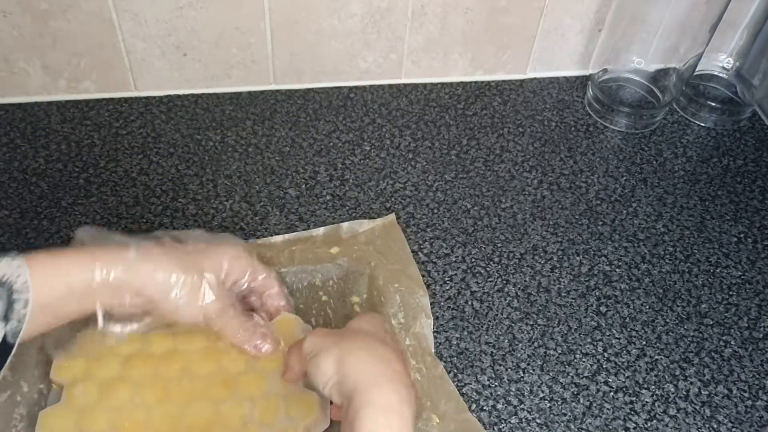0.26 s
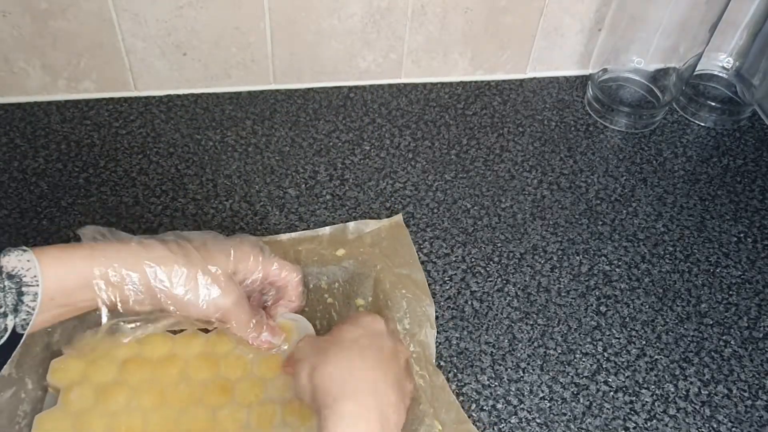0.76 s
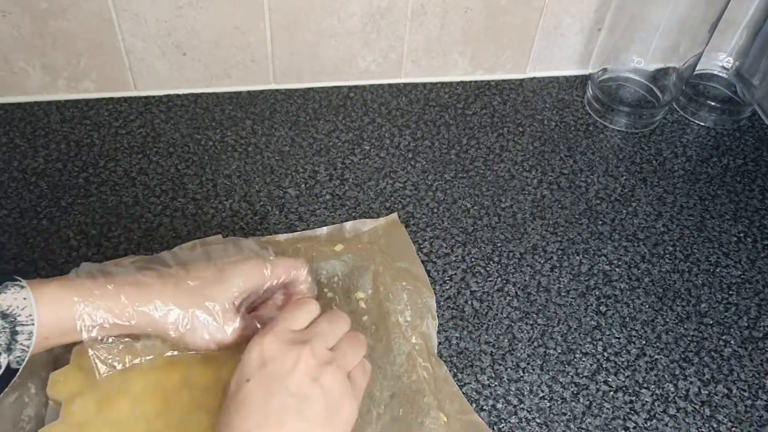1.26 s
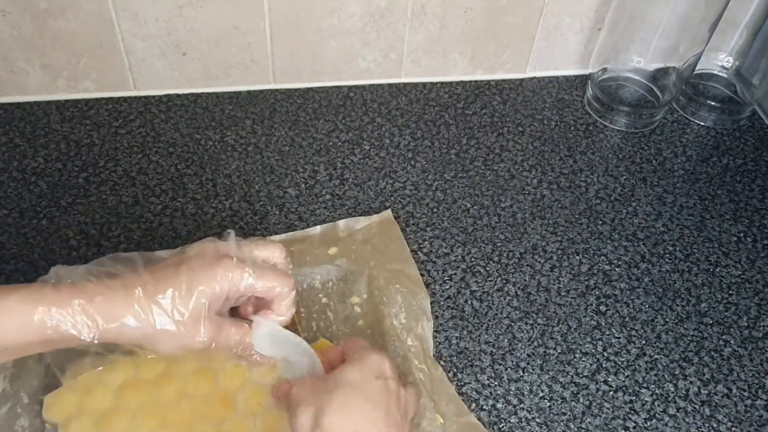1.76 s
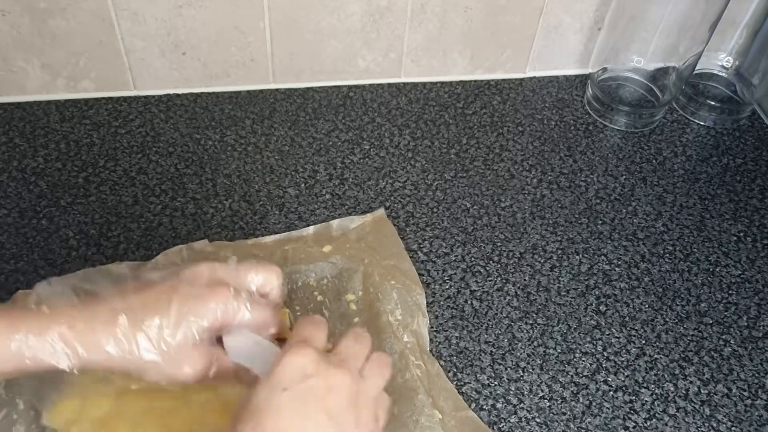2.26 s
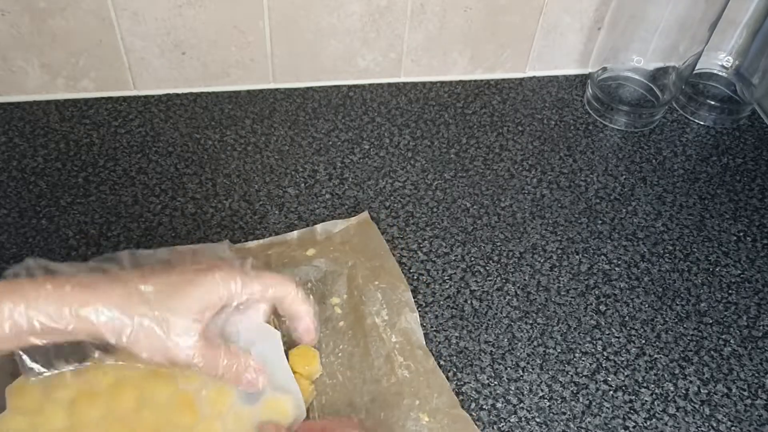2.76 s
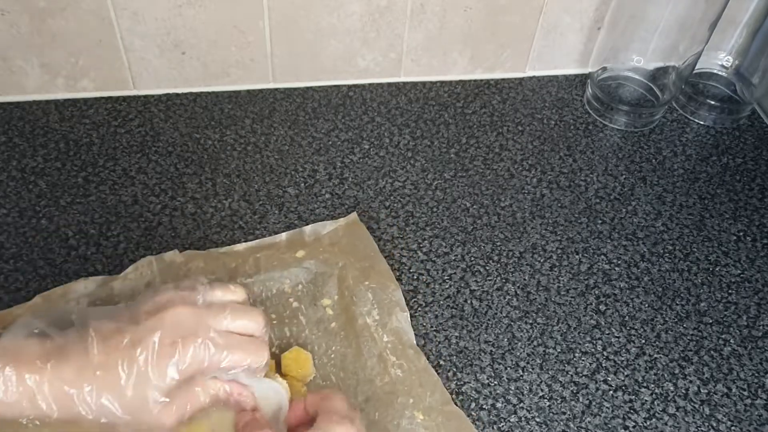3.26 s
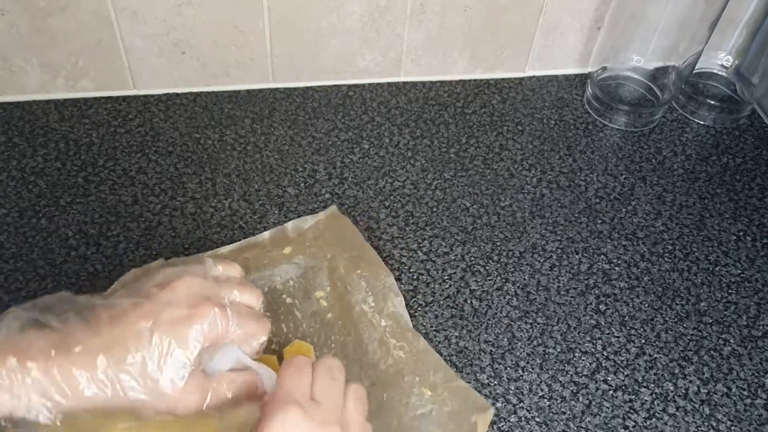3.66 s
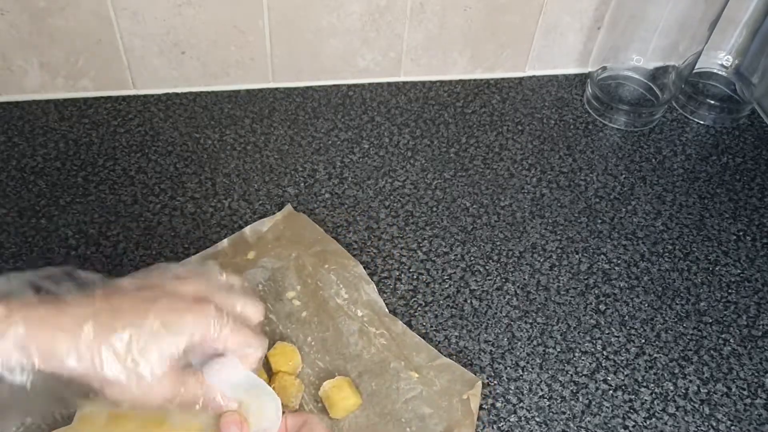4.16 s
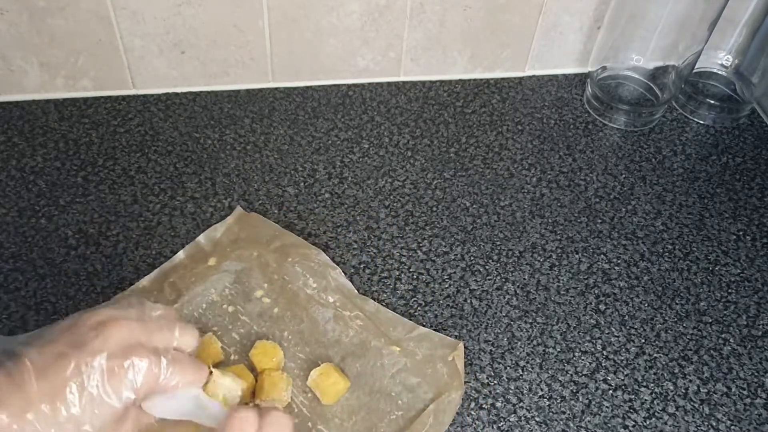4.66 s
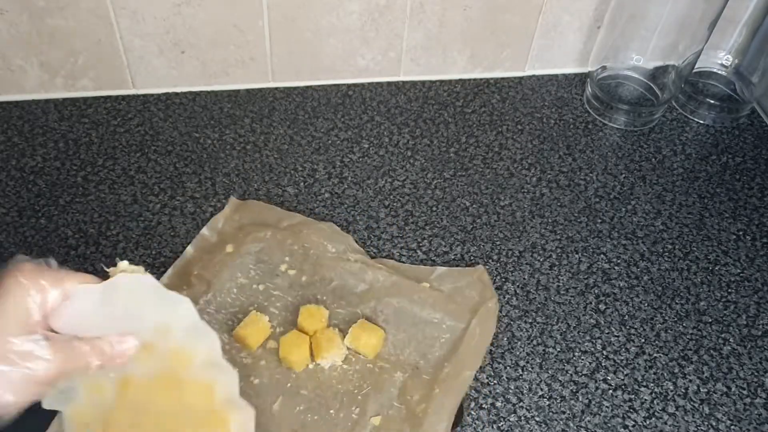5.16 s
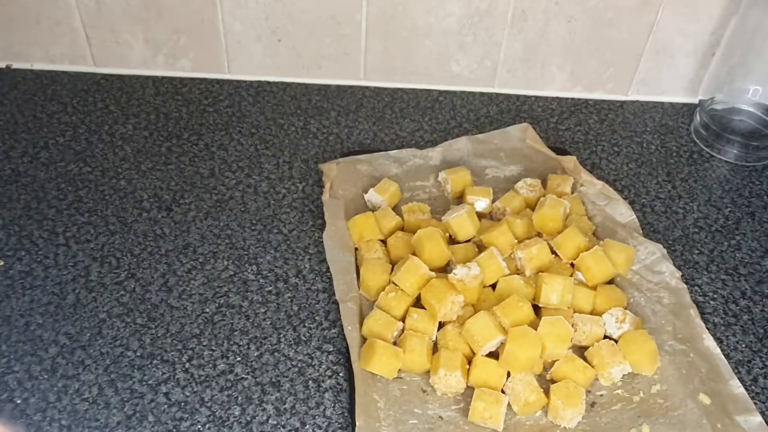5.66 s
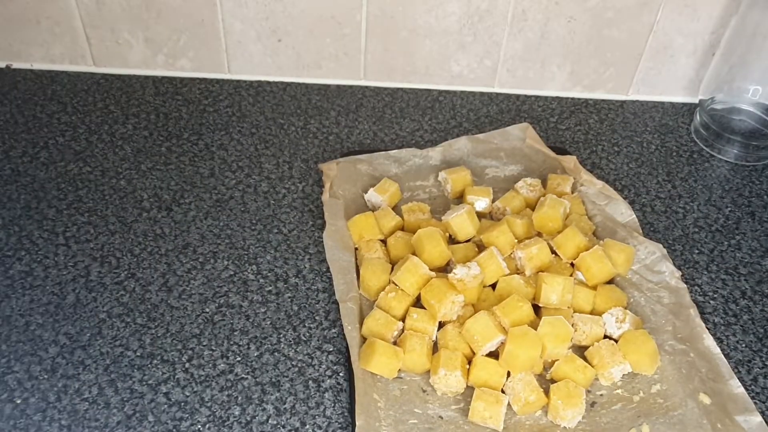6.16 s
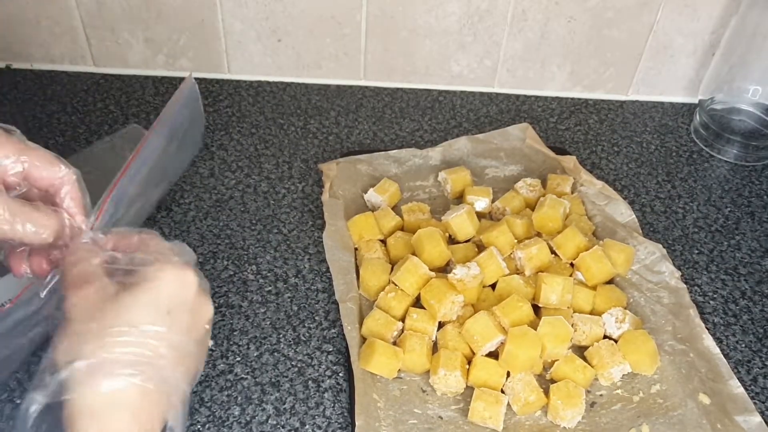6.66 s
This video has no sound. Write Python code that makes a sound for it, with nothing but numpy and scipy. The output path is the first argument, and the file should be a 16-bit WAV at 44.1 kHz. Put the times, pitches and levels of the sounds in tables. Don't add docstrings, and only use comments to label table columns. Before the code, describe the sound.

Thin plastic gloves rustle while frozen cubes crack loose from a flexible tray in sharp pops, then a plastic bag crinkles brightly.

```python
import sys
import numpy as np
from scipy import signal
from scipy.fft import rfft, irfft, next_fast_len
from scipy.io import wavfile
from scipy.ndimage import uniform_filter1d, map_coordinates

SR = 44100
rng = np.random.default_rng(int(sys.argv[2]) if len(sys.argv) > 2 else 0)


def linear_from_db(decibels):
    return 10 ** (np.asarray(decibels, float) / 20)


def store_wav(level_fs):
    pcm = np.round(np.clip(np.atleast_2d(level_fs), -1, 1) * 32767)
    wavfile.write(sys.argv[1], SR, pcm.T.astype(np.int16))


N = 304290

# (fade out t/s, sound returns t/s, fade-in length/s)
SCENE_CHANGE = (5.444, 5.455, 0.045)
LEFT_LEAD = {"tray": 5, "hands": 6, "bag": 11}

# (f/Hz, level/dB per Hz)
AIR_COLOUR = [(20, -14.5), (45, 4), (120, -3), (250, -10), (700, -15), (1000, -22), (2500, -29),
              (7000, -19), (8800, -49), (15000, -48)]
# (f/Hz, time to fall 60 dB/s)
ECHO_TIME = [(100, 0.077), (1200, 0.12), (3000, 0.1), (6000, 0.066), (9000, 0.042), (15000, 0.0116)]
# (f/Hz, likeness 0 to 1)
PORT_LIKENESS = [(60, 0.96), (300, 0.87), (1000, 0.27), (2500, 0.11), (5000, 0.011), (15000, 0.014)]

# (f/Hz, level/dB per Hz)
PLASTIC_COLOUR = [(180, -46), (300, -14.5), (787, -5.5), (870, -8), (1060, -10.5), (1900, -6.5),
                  (2320, -6.5), (2930, -4), (6850, -1), (8500, -8), (15500, -4), (16300, -13.5)]
# (f/Hz, level/dB per Hz)
PAPER_COLOUR = [(200, -16), (400, -3), (850, -18.5), (1200, 2), (2400, 1.5), (3500, -0.5), (6000, -6),
                (12000, -41)]
# (peak t/s, level/dB, swell/s, sink/s)
GLOVE_STROKES = [(0.009, -40.5, 0.015, 0.0374), (0.073, -44.5, 0.12, 0.18), (0.129, -40.5, 0.0322, 0.0218),
                 (0.147, -43, 0.026, 0.0312), (0.2, -42, 0.0291, 0.0353), (0.266, -50.5, 0.053, 0.0114),
                 (0.342, -46.5, 0.058, 0.0332), (0.381, -49, 0.0062, 0.0093), (0.471, -54.5, 0.034, 0.0322),
                 (0.542, -53, 0.0072, 0.026), (0.586, -50, 0.029, 0.0114), (0.626, -53.6, 0.0312, 0.14),
                 (0.699, -53, 0.1362, 0.052), (0.784, -58.4, 0.0062, 0.1861), (0.819, -50.5, 0.0197, 0.0135),
                 (0.849, -44.5, 0.02, 0.024), (0.909, -51, 0.0343, 0.08), (0.985, -50, 0.0364, 0.0249),
                 (1.027, -55.2, 0.0114, 0.027), (1.071, -55, 0.026, 0.028), (1.095, -53.9, 0.0062, 0.0176),
                 (1.127, -51, 0.0145, 0.0166), (1.166, -50, 0.0062, 0.0145), (1.242, -48.5, 0.0748, 0.0093),
                 (1.289, -43.5, 0.0239, 0.0093), (1.314, -46.5, 0.0249, 0.076), (1.376, -42.5, 0.0228, 0.017),
                 (1.419, -54.5, 0.1976, 0.07), (1.537, -57.9, 0.0072, 0.261), (1.56, -43.5, 0.0062, 0.0145),
                 (1.611, -59.4, 0.0904, 0.0104), (1.654, -45, 0.0072, 0.0085), (1.682, -40, 0.0052, 0.024),
                 (1.779, -59.2, 0.0062, 0.0644), (1.859, -55, 0.046, 0.2319), (1.959, -49, 0.024, 0.0093),
                 (2.004, -44, 0.026, 0.1), (2.115, -50, 0.0114, 0.062), (2.172, -48, 0.0176, 0.0436),
                 (2.257, -50.0, 0.018, 0.0187), (2.308, -37, 0.0093, 0.021), (2.401, -47.1, 0.0322, 0.0135),
                 (2.424, -47, 0.0135, 0.059), (2.493, -39.0, 0.025, 0.076), (2.563, -46, 0.0239, 0.0104),
                 (2.603, -49.5, 0.0093, 0.0769), (2.656, -30.5, 0.0062, 0.015), (2.732, -42, 0.0384, 0.037),
                 (2.749, -41.5, 0.018, 0.032), (2.862, -47, 0.1, 0.038), (2.935, -47, 0.05, 0.11),
                  (3.049, -48.5, 0.042, 0.023), (3.08, -46, 0.017, 0.14), (3.191, -44, 0.016, 0.011),
                  (3.224, -51.5, 0.021, 0.045), (3.303, -59, 0.033, 0.029), (3.333, -50.5, 0.04, 0.023),
                  (3.396, -51, 0.01, 0.017), (3.428, -53, 0.0091, 0.013), (3.512, -55, 0.021, 0.027),
                  (3.541, -54, 0.014, 0.031), (3.61, -50.5, 0.0093, 0.018), (3.671, -32, 0.014, 0.021),
                  (3.791, -47, 0.034, 0.018), (3.933, -49, 0.058, 0.02), (3.969, -52, 0.046, 0.022),
                  (4.026, -48, 0.034, 0.017), (4.05, -48, 0.019, 0.034), (4.182, -50, 0.11, 0.15),
                  (4.274, -59, 0.071, 0.019), (4.297, -56, 0.0083, 0.014), (4.352, -62, 0.0083, 0.016),
                  (4.375, -60, 0.014, 0.012), (4.438, -46.5, 0.064, 0.021), (4.473, -49, 0.036, 0.039),
                  (4.557, -43.5, 0.053, 0.023), (4.586, -44.5, 0.029, 0.0092),
                  (4.604, -31.5, 0.0053, 0.017), (4.697, -48, 0.019, 0.011), (4.748, -63, 0.041, 0.016),
                  (4.774, -42, 0.011, 0.018), (4.831, -45.5, 0.03, 0.03), (4.862, -59, 0.017, 0.035),
                  (4.909, -48, 0.006, 0.024), (4.957, -50.5, 0.018, 0.037), (5.006, -71, 0.013, 0.039),
                  (5.093, -48, 0.063, 0.029), (5.14, -36.5, 0.0064, 0.011), (5.217, -50.5, 0.011, 0.031),
                  (5.269, -54.5, 0.031, 0.04), (5.305, -54.5, 0.025, 0.08), (5.38, -54.5, 0.046, 0.067),
                  (5.438, -66, 0.015, 0.0037)]
# (peak t/s, level/dB, swell/s, sink/s)
BAG_HANDLING = [(5.478, -65, 0.007, 0.005), (5.507, -53, 0.012, 0.042), (5.535, -44.5, 0.02, 0.063),
                (5.569, -44, 0.03, 0.038), (5.615, -42, 0.023, 0.028), (5.64, -37, 0.027, 0.032),
                (5.679, -39, 0.035, 0.05), (5.715, -40.5, 0.049, 0.0074), (5.802, -48, 0.053, 0.016),
                (5.831, -48, 0.01, 0.031), (5.849, -46, 0.006, 0.023), (5.875, -45, 0.005, 0.011),
                (5.895, -43.5, 0.0092, 0.024), (5.941, -44, 0.037, 0.012), (6.011, -32.5, 0.031, 0.016),
                (6.071, -40, 0.075, 0.096), (6.108, -30.5, 0.031, 0.074), (6.14, -31, 0.075, 0.02),
                (6.218, -37.5, 0.014, 0.018), (6.356, -44.5, 0.095, 0.061), (6.401, -38, 0.016, 0.12),
                (6.478, -41.5, 0.099, 0.015), (6.544, -42, 0.015, 0.038), (6.591, -36.5, 0.009, 0.0084),
                (6.658, -38, 0.08, 0.03), (6.705, -41, 0.02, 0.024), (6.744, -41.5, 0.058, 0.084),
                (6.805, -30.5, 0.016, 0.01), (6.835, -28.5, 0.02, 0.013), (6.889, -41, 0.043, 0.067)]
# (peak t/s, level/dB, swell/s, sink/s)
LOW_SCUFFS = [(.19, -41, 0.28, 0.11), (.37, -51.5, 0.18, 0.012), (.6, -49.5, 0.031, 0.15),
              (1, -51.5, 0.28, 0.15), (1.41, -51, 0.39, 0.05), (1.69, -55, 0.22, 0.31),
              (2.02, -51.5, 0.051, 0.4), (2.29, -50, 0.054, 0.16), (2.5, -48, 0.028, 0.074),
              (2.75, -46, 0.21, 0.24), (3.1, -57, 0.21, 0.58), (3.67, -35.5, 0.032, 0.051),
              (3.79, -46.5, 0.0092, 0.013), (3.9, -50.5, 0.21, 0.35), (4.44, -42, 0.036, 0.053),
              (4.56, -43, 0.054, 0.06), (4.65, -44, .02, 0.051), (4.96, -44.5, 0.051, 0.056),
              (5.12, -41.5, 0.094, 0.046), (5.17, -31, 0.03, 0.032), (5.25, -54, .05, 1),
              (5.6, -47.5, 0.052, 0.2), (5.7, -43.5, 0.24, 0.034), (5.86, -51.5, 0.13, 0.39),
              (6.08, -41, 0.054, 0.17), (6.48, -50, 0.12, 0.039), (6.8, -50, 0.34, 0.07),
              (6.9, -48, 0.029, .1)]

# (f/Hz, level/dB per Hz)
ICE_COLOUR = [(120, -49.5), (250, -11.5), (650, -3.5), (850, -9), (1200, -2.5), (1900, -5.5), (2700, -3.5),
              (4000, -4), (6300, -11.5), (9000, -30), (13500, -22.5), (16500, -45)]
# (f/Hz, width/Hz, level/dB)
TRAY_MODES = [(657, 51, 3.5), (861, 17, 5.5), (1150, 55, 6.5), (1456, 16, 5), (1767, 44, 4), (1900, 95, 6),
              (2374, 94, 3.5), (2640, 37, 5.5), (3150, 130, 1.5)]
# (t/s, level/dB, cavity f/Hz, brightness/dB, tearing time/ms)
ICE_TEARS = [(.001, -32, 1440, -35, 13), (1.212, -39, 1850, 0, 8.4), (1.313, -22, 1150, -34, 8.2),
             (2.105, -22.5, 1150, -27, 13), (2.323, -24.5, 1230, -30, 12.7), (2.484, -29, 2160, -47, 6.8),
             (3.636, -18.5, 1170, -39, 14.2), (3.663, -7.5, 1880, -26, 8.8), (3.677, -12.5, 1220, -37, 8),
             (3.699, -25.5, 1180, -32, 6.2), (4.386, -35, 1120, -33, 21), (4.426, -34, 1330, -24, 19),
             (4.467, -38, 1490, -18, 7.2), (4.52, -28, 1730, -12, 13.6), (6.1, -19.5, 1700, -17, 8),
             (3.714, -34, 1300, -13, 9.2), (1.393, -42, 2440, -26, 3.9)]
# (t/s, level/dB, cavity f/Hz, brightness/dB)
ICE_TICKS = [(0.377, -29, 2800, -1), (0.542, -33, 1800, 15), (3.967, -39, 1120, -30),
             (0.582, -32.5, 2720, 5), (0.933, -29, 2770, -20), (1.125, -33, 1720, -3),
             (1.163, -34, 2040, -14), (1.785, -39.5, 1580, -30), (3.299, -33.5, 2530, -7),
             (3.365, -36.5, 880, -3), (3.485, -40, 710, -18), (3.594, -43, 756, -7),
             (3.902, -33.5, 1380, -4), (4.293, -31, 1160, -8), (4.63, -30, 1480, -8),
             (4.905, -34, 1600, 13), (4.952, -29, 2010, -18), (5.001, -35.5, 1690, -13),
             (5.3684, -26, 1900, -33), (5.392, -33, 2850, -29.5), (5.637, -25, 3020, -15)]
# (t/s, level/dB, cavity f/Hz, brightness/dB, body/dB)
CUBE_POPS = [(1.324, -21.5, 1430, -40, -14.5), (1.6772, -11, 1150, -13, -13.5),
             (1.684, -21.5, 1150, -47, -14.5), (2.118, -18, 1170, -29, -13), (2.3028, -12, 656, -22, -14.5),
             (2.311, -18.5, 1180, -33, -20), (2.654, -16, 2760, 11, -11.5), (4.598, -8.5, 1050, -30, -28),
             (4.6045, -7, 1310, -14, -27.5), (4.768, -18.5, 1600, -23, -24), (5.135, -3, 1200, -30, -24),
             (5.14, -6, 1420, -28, -21), (6.797, -20, 544, -44, -28)]

# (t/s, level/dB, f/Hz)
WORKTOP_KNOCKS = [(0.019, -42, 114), (1.324, -43.5, 108), (1.677, -34, 139), (1.786, -39, 94),
                  (2.104, -39, 139), (2.111, -34, 114), (2.176, -40.5, 103), (2.306, -38, 193),
                  (2.313, -30.5, 107), (2.659, -36.5, 124), (2.783, -44.5, 104), (3.642, -33, 113),
                  (3.846, -42.5, 120.5), (4.31, -42.5, 124), (4.426, -42, 119), (4.507, -40.5, 118),
                  (4.6, -37, 109), (4.692, -49, 200), (4.925, -40, 121), (5.137, -27.5, 132.5),
                  (5.37, -45, 101), (6.098, -34.5, 106.6), (6.582, -49, 107), (6.795, -41.5, 127)]
# (t/s, level/dB, left-right/dB)
GLOVE_SNAPS = [(0.3774, -29.5, 1), (0.8462, -34, -1), (0.9864, -37, 1), (1.1645, -28, -9), (1.272, -43, -4),
               (1.372, -35, 8), (1.5557, -29.5, -5), (1.6493, -32, -2), (2.0013, -33, 13), (2.488, -35, 9),
               (2.6532, -22, 3), (2.739, -29, 2), (3.0754, -34, 4), (3.189, -37, -11), (4.599, -15, -6),
               (4.905, -29.5, 4),
               (0.1994, -38, 1), (0.542, -38, 0.0), (0.8145, -44, -1.0), (1.0914, -44, -1.5),
               (1.2894, -37, -3), (1.7759, -46, -1.0), (2.4179, -37, 6), (2.6005, -41, -1.5),
               (3.0185, -35, 2), (3.0464, -32, 1.0), (3.2194, -41, 3), (3.3907, -36, -0.5),
               (3.4268, -38, 3), (3.5084, -38, -2.5), (3.55, -39, -1.0), (3.9, -41, -2.5),
               (4.0482, -35, -5), (4.117, -40, -1.0), (4.1684, -39, -1.0), (4.3555, -39, 7),
               (4.7686, -30, -0.5), (5.2094, -40, -1.5)]
# (t/s, level/dB, left-right/dB)
BAG_FILM_SNAPS = [(5.4742, -36.5, -21.5), (5.506, -35.5, -25), (5.5198, -30, -8), (5.609, -25.5, 5),
                  (5.7116, -30.5, 18), (5.8504, -31.5, 6.5), (5.874, -28, 6), (5.893, -29, 5),
                  (6.008, -22, -15), (6.08, -21, 5), (6.102, -14.5, -3), (6.2153, -28, -7),
                  (6.5875, -26.5, -3), (6.7038, -17, 0), (6.797, -17.5, -14), (6.8267, -30, 5),
                  (6.8312, -34, -10)]
# (t/s, level/dB, f/Hz, left-right/dB)
CUBE_TAPS = [(1.679, -17, 1170, -6), (1.685, -10, 1190, 1), (2.788, -41.5, 700, 8), (3.788, -30, 656, 7.5),
             (3.968, -36, 660, 4), (4.694, -35, 704, 13), (5.1355, -5, 1150, 4), (6.703, -41, 734, 14),
             (6.799, -20, 504, 7), (0.583, -30.5, 2650, 9), (1.163, -31.5, 1990, 5), (2.884, -33, 3600, -3),
             (3.79, -40, 1770, 0.1), (3.967, -35, 1280, -3), (3.672, -13, 1900, -6), (3.672, -20, 4320, 18),
             (4.536, -27, 1760, -5), (4.767, -28, 1400, -11), (5.136, -9.5, 2630, -9),
             (5.147, -18, 3120, -10), (5.151, -12, 1210, -5), (5.164, -24, 3150, 3), (6.803, -28, 1900, 7),
             (1.6805, -15, 660, 8.5), (2.1231, -23, 1250, 2), (4.5995, -10, 1255, 5)]
# (t/s, level/dB, f/Hz)
NARROW_CREAKS = [(0.685, -39, 2050), (0.916, -44, 2600), (1.225, -43.5, 2500), (4.378, -43, 1200),
                 (4.404, -44, 1190), (4.52, -35, 1210), (2.052, -39, 1320), (2.245, -36.5, 1180),
                 (2.516, -34, 1910), (5.036, -42.5, 1150), (5.519, -32.5, 2850), (5.602, -32, 2960),
                 (5.663, -32, 2850)]


def unit(x):
    return x / np.sqrt(np.mean(x ** 2) + 1e-20)


def along(points, hz):
    f, value = np.transpose(points)
    return np.interp(np.log(hz + 1), np.log(f + 1), value)


def wobble(rate):
    knots = rng.standard_normal(int(N * rate / SR) + 4)
    return unit(map_coordinates(knots, [np.arange(N) * rate / SR]))


def coloured(x, gain_db):
    m = 2 * next_fast_len(x.shape[-1] // 2 + 512)
    gain = linear_from_db(gain_db(np.fft.rfftfreq(m, 1 / SR)))
    cepstrum = irfft(np.log(np.maximum(gain, 1e-6)), m)
    cepstrum[..., 1:m // 2] *= 2
    cepstrum[..., m // 2 + 1:] = 0
    return irfft(rfft(x, m) * np.exp(rfft(cepstrum)), m)[..., :x.shape[-1]]


def ports(pair):
    size = pair.shape[-1]
    turn = np.arccos(np.clip(along(PORT_LIKENESS, np.fft.rfftfreq(size, 1 / SR)), -1, 1)) / 2
    z = rfft(pair)
    mid = z[..., 0, :] * np.cos(turn)
    side = z[..., 1, :] * np.sin(turn)
    return irfft(np.stack([mid + side, mid - side], axis=-2), size)


def panned(x, db):
    return x * linear_from_db(np.array([db / 2, -db / 2]).reshape(2, -1))


def leading(x, samples):
    return np.array([x[0], np.pad(x[1], (samples, 0))[:N]])


def laid(rows, seconds):
    out = np.zeros((2, N + rows.shape[-1]))
    for s, row in zip(seconds, rows):
        out[:, round(s * SR):][:, :rows.shape[-1]] += row
    return out[:, :N]


def echoed(near, wet_db, colour_db):
    count, size = near.shape
    noise = ports(rng.standard_normal((count, 2, size)))
    hz, t, z = signal.stft(noise, SR, nperseg=128)
    decay = linear_from_db(-60 * t / along(ECHO_TIME, hz)[:, None])
    tail = signal.istft(z * decay, SR, nperseg=128)[1][..., :size]
    tail /= np.linalg.norm(tail[:, :1], axis=2, keepdims=True)
    fed = np.sqrt(np.cumsum(near ** 2, axis=1))
    both = near[:, None] + linear_from_db(wet_db) * fed[:, None] * tail
    both = coloured(both, lambda f: colour_db(f)[..., None, :])
    return both / np.abs(both.mean(1, keepdims=True)).max(2, keepdims=True)


def cracks(length_ms, rise, size):
    u = np.arange(size) / SR / (np.clip(length_ms, .3, 40) / 1000)
    noise = rng.standard_normal((len(u), 2, size))
    uneven = noise[:, 0] * np.exp(.5 * noise[:, 1])
    return uneven * u ** rise * np.exp(-2 * u)


def crinkle(spectrum, spikiness, clump_db, rate, patchy_db=2.13):
    snaps = rng.standard_normal((2, N)) * np.exp(spikiness * wobble(1500)) * linear_from_db(clump_db * wobble(rate))
    z = signal.stft(snaps, nperseg=512)[2]
    patches = uniform_filter1d(rng.standard_normal(z.shape[1:]), size=7, axis=0)
    patches = uniform_filter1d(patches, size=7, axis=1)
    snaps = signal.istft(z * linear_from_db(patchy_db * unit(patches)), nperseg=512)[1][:, :N]
    colour = linear_from_db(along(spectrum, np.fft.rfftfreq(N, 1 / SR)))
    return unit(ports(irfft(rfft(snaps) * colour, N)))


def rumble():
    level_db = -62 + 3.0
    return linear_from_db(level_db) * crinkle(AIR_COLOUR, 0.021, clump_db=1.2, rate=7.7)


def folds(rate, strength, fade_s):
    chance = rng.random((2, N))
    jumps = (chance[0] < rate / SR) * -np.log(chance[1] + 1e-9)
    sinking = signal.lfilter([1], [1, -np.exp(-1 / (fade_s * SR))], jumps)
    return unit(1 + strength * sinking)


def strokes(rows):
    s, db, swell, sink = np.transpose(rows)[:, :, None]
    t = np.arange(0, N / SR + .01, .001)
    before_peak = (s - t) / np.maximum(swell, .003)
    after_peak = (t - s) / np.maximum(sink, .003)
    level_db = db - 10 * np.maximum(before_peak, after_peak)
    same_shot = (s < SCENE_CHANGE[1]) == (t < SCENE_CHANGE[1])
    power = (linear_from_db(2 * level_db) * same_shot).sum(0)
    return np.sqrt(np.interp(np.arange(N) / SR, t, power))


def rustle():
    creases = folds(110, strength=.16, fade_s=.003)
    plastic_moves = linear_from_db(1.72) * strokes(GLOVE_STROKES + BAG_HANDLING)
    plastic = creases * plastic_moves * crinkle(PLASTIC_COLOUR, 0.22, clump_db=1.4, rate=160)
    paper = creases * strokes(LOW_SCUFFS) * crinkle(PAPER_COLOUR, .35, clump_db=1.8, rate=55)
    return panned(plastic + paper, -0.15 - 0.9 * wobble(6.7))


def breaks():
    pops = [(*row, 3.54, -1.5) for row in CUBE_POPS]
    ticks = []
    for row in ICE_TICKS:
        body_db = -15.5 - 4.5 * np.log2(row[2] / 1e3)
        ticks.append((*row, body_db, 2.5, 0))
    tears = [(*row[:4], -19, row[4], 3) for row in ICE_TEARS]
    return pops + ticks + tears


def cubes():
    s, db, hz, bright_db, body_db, length_ms, room_db = np.transpose(breaks())[:, :, None]

    def colour(f):
        cavity = 20 * np.log10(.7 + 1 / np.hypot(1, (f * f - hz * hz) / (.25 * hz * f + 1)))
        treble = (bright_db + 26.5) * np.clip(np.log2((f + 1) / 2500) / 2.95, 0, 1)
        body = (body_db + 17.0) * np.clip(np.log2(1050 / (f + 1)) / 0.99, 0, 1.6)
        modes = sum(level / (1 + (2 * (f - centre) / width) ** 2) for centre, width, level in TRAY_MODES)
        return along(ICE_COLOUR, f) + modes + cavity + treble + body

    rise = np.clip(length_ms / 9, 1.1, 3)
    both = echoed(cracks(length_ms, rise, size=6144), room_db[:, None], colour)
    return laid(linear_from_db(db + 0.5)[:, None] * both, s[:, 0])


def worktop(size=7000):
    t60_s, press_s = 0.095, 0.0042
    out = np.zeros(N + size)
    t = np.arange(size) / SR
    for s, db, hz in WORKTOP_KNOCKS:
        swing = np.sin(2 * np.pi * hz * t) + 0.39 * np.sin(2 * np.pi * 1.665 * hz * t)
        decay = linear_from_db(db + 4.0 - 60 * t / t60_s)
        out[round(s * SR):][:size] += decay * (1 - np.exp(-t / press_s)) * swing
    return out[:N]


def film():
    s, db, pan_db = np.transpose(GLOVE_SNAPS + BAG_FILM_SNAPS)[:, :, None]
    snaps = cracks(1.5 + 0 * s, rise=0.76, size=3072)
    both = echoed(snaps, -5.0, lambda f: along(PLASTIC_COLOUR, f))
    return laid(linear_from_db(db - 0.5 + pan_db * [.5, -.5])[..., None] * both, s[:, 0])


def taps():
    s, db, hz, pan_db = np.transpose(CUBE_TAPS)[:, :, None]
    sharpness = 5 * (hz / 1e3) ** 0.66
    turns = hz * np.arange(4096) / SR
    blow = turns * np.exp(-6 * turns)

    def mode(f):
        detuning = (f * f - hz * hz) / (hz * f + 1)
        return -30 * np.log10(np.hypot(1, np.clip(sharpness, 1, 30) * detuning))

    both = echoed(blow, -0.5, mode)
    return laid(linear_from_db(db - 2.5 + pan_db * [.5, -.5])[..., None] * both, s[:, 0])


def creaks():
    s, db, hz = np.transpose(NARROW_CREAKS)[:, :, None]

    def mode(f):
        return -30 * np.log10(np.hypot(1, 4.8 * (f * f - hz * hz) / (hz * f + 1)))

    slips = cracks(18.5 + 0 * s, rise=1.25, size=5120)
    return laid(linear_from_db(db)[..., None] * echoed(slips, 4, mode), s[:, 0])


def scene():
    tray = leading(cubes() + taps() + creaks() + worktop(), LEFT_LEAD["tray"])
    hands = film() + rustle() + rumble()
    first_shot = np.arange(N) < SCENE_CHANGE[1] * SR
    near_hands = leading(hands, LEFT_LEAD["hands"])
    far_bag = leading(hands, LEFT_LEAD["bag"])
    return tray + np.where(first_shot, near_hands, far_bag)


def roll_off(x):
    return signal.sosfilt(signal.butter(12, 16990, fs=SR, output="sos"), x)


def record(dry):
    out, back, fade = SCENE_CHANGE
    gate = np.interp(np.arange(N) / SR, [out - .004, out, back, back + fade], [0.96, 0.012, 0.0075, 1.0])
    rounded = 1.286 * np.tanh(dry * gate / 1.314)
    band_limit = signal.butter(24, 15900, fs=SR, output='sos')
    mix = signal.sosfiltfilt(band_limit, rounded)
    return roll_off(mix)


dry = scene()
out = record(dry)
store_wav(out)
```